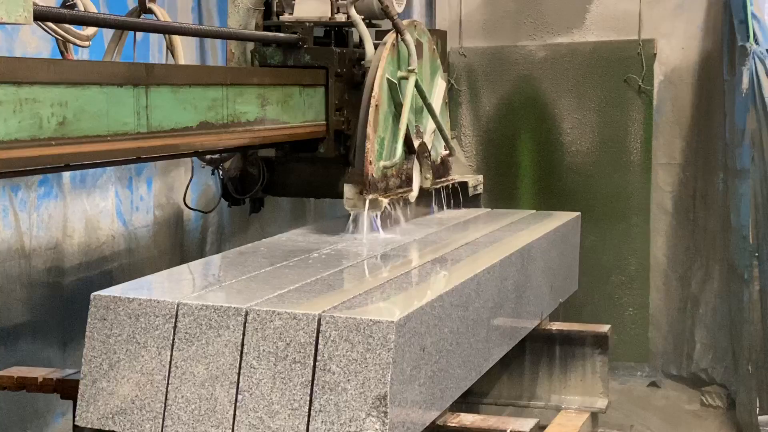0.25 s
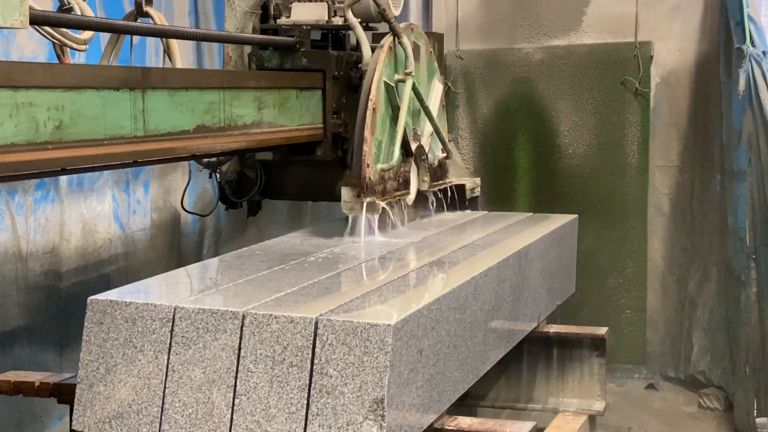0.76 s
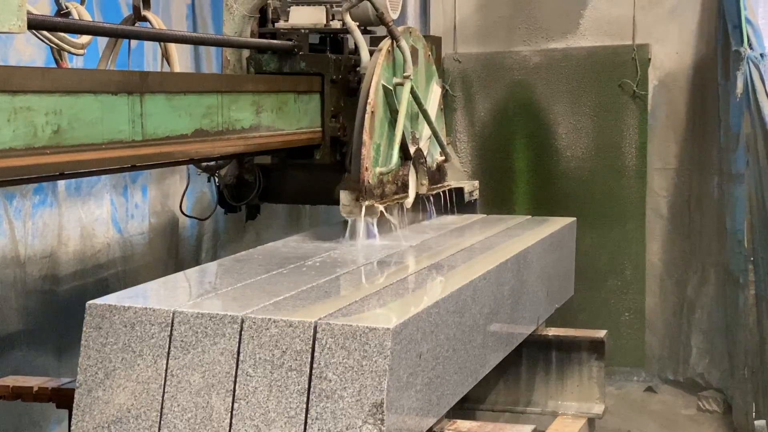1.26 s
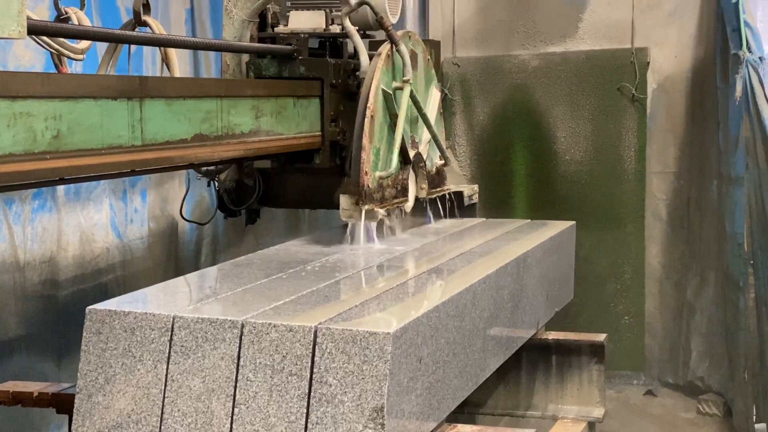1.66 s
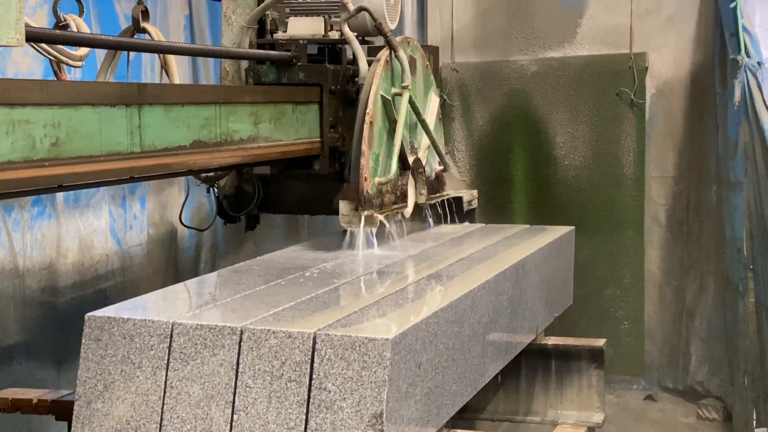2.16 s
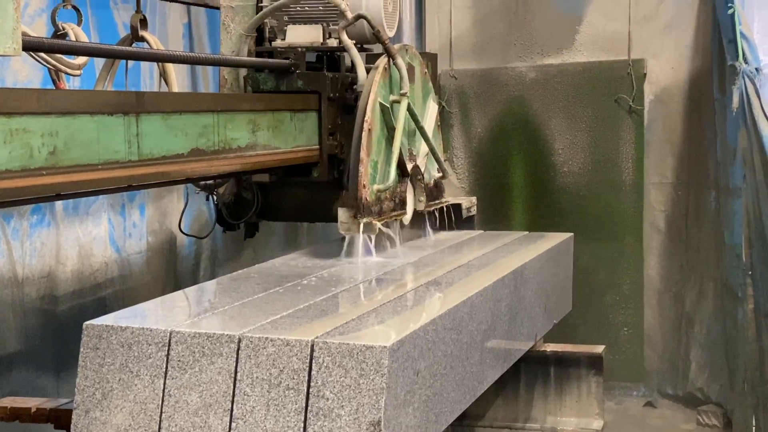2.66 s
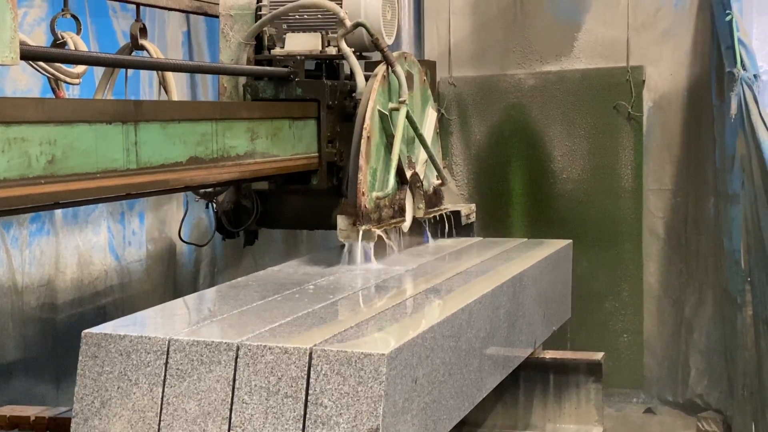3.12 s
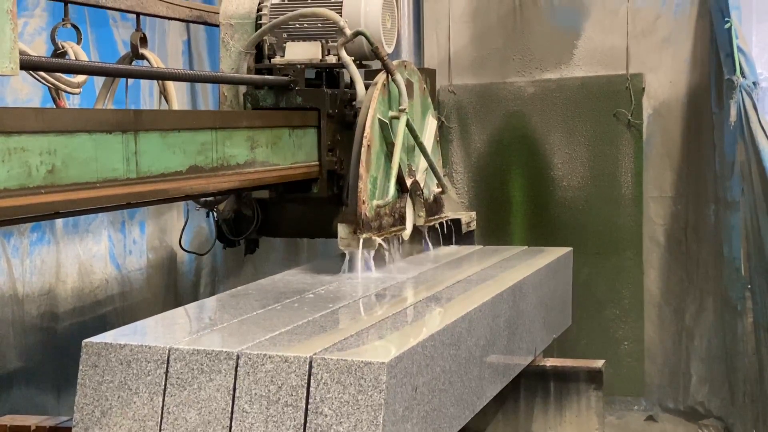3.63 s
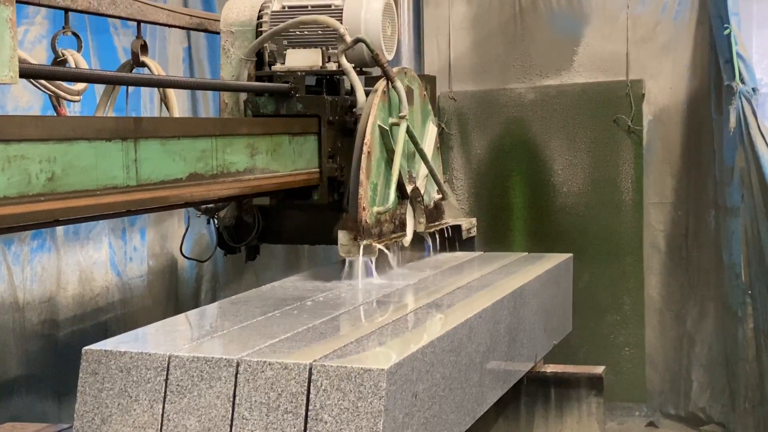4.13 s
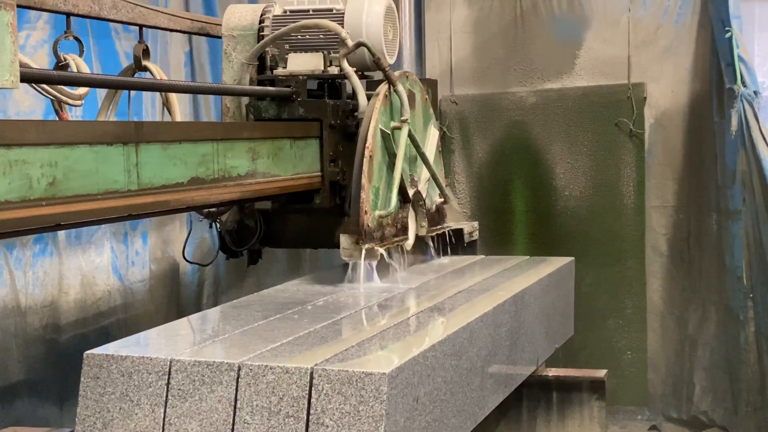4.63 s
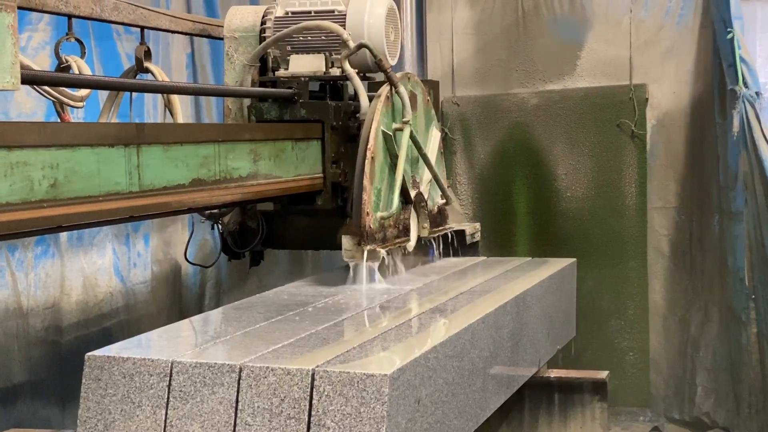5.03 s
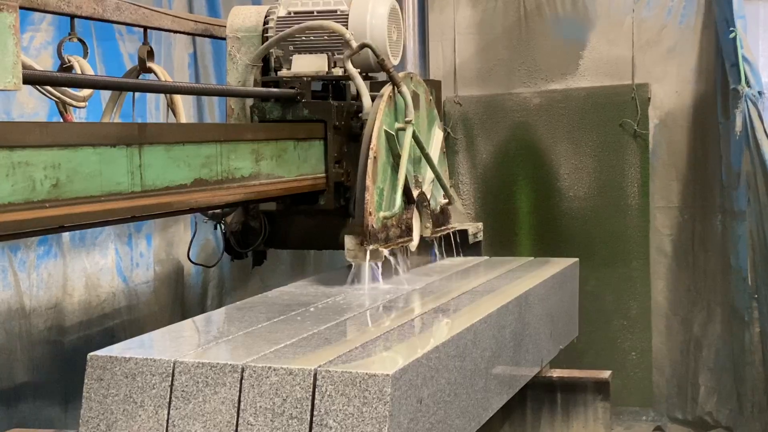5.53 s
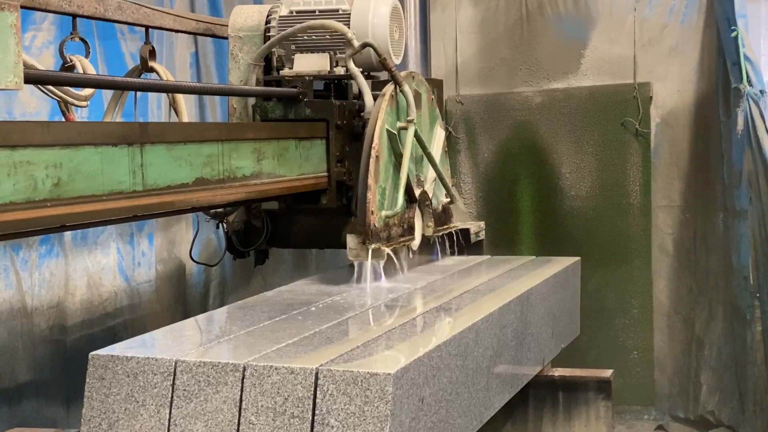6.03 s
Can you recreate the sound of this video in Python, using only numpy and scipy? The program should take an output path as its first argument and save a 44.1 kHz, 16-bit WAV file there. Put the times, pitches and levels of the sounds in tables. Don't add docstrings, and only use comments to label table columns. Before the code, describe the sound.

A large wet saw cuts granite without pause in a hard-walled workshop. Dense, gritty grinding noise nearly repeats about nine times a second, giving a fast whirring flutter. Motor hum and faint shaft tones lie beneath, water hisses above. Resonances shift slowly as the blade moves. Close stereo microphones; no start, stop or other event.

```python
import sys
import numpy as np
from scipy import signal
from scipy.fft import rfft, irfft
from scipy.io import wavfile
from scipy.ndimage import uniform_filter1d, map_coordinates

SR = 44100
rng = np.random.default_rng(int(sys.argv[2]) if len(sys.argv) > 2 else 0)


def attenuation_scalar(level_db):
    decades = np.asarray(level_db, float) / 20
    return 10 ** decades


def int16_out(signal):
    q = np.round(np.clip(np.atleast_2d(signal).T, -1, 1) * 32767)
    wavfile.write(sys.argv[1], SR, q.astype(np.int16))


N = 276948
HZ = np.fft.rfftfreq(N, 1 / SR)
TURN = 4938
STEPS = 4


def read(rows, hz):
    f, *columns = np.transpose(rows)
    return [np.interp(np.log(hz + 1), np.log(f + 1), column) for column in columns]


def drift(shape, frames, bins):
    field = uniform_filter1d(rng.standard_normal(shape), int(frames), 0)
    field = uniform_filter1d(field, int(bins), 1)
    return field / field.std()


# t/s, speed/turns per s
BLADE_SPEED = [
    (0, 8.908),
    (3.2, 8.931),
    (6.3, 8.955),
]


def turns():
    speed = np.interp(np.arange(N) / SR, *np.transpose(BLADE_SPEED))
    return np.cumsum(speed) / SR


# t/s, place/half waves
BLADE_PATH = [
    (0, 0),
    (1.5, .04),
    (2.6, .12),
    (3.3, .38),
    (4, .56),
    (4.7, .76),
    (5.2, 1),
    (5.6, 1.22),
    (6.3, 1.26),
]


def swept(t, mean_db, swing_db, place):
    blade_place = np.interp(t, *np.transpose(BLADE_PATH))
    return mean_db + swing_db * np.cos(np.pi * (blade_place - place))


# f/Hz, level/dB rms
MAINS_HUM = [
    (60, -66),
    (120, -63),
]


def motor():
    t = np.arange(N) / SR
    hum = np.zeros((2, N))
    for hz, db in MAINS_HUM:
        start = rng.random((2, 1))
        hum += np.sqrt(2) * attenuation_scalar(db) * np.cos(2 * np.pi * (hz * t + start))
    return hum


# order/tone cycles per turn, mean level/dB rms, swing/dB, loudest place/half waves
SHAFT_TONES = [(6, -64.0, 1.5, -0.0), (7, -63.5, 3.0, -0.01), (8, -63.5, 6.0, -0.18),
               (12, -55.5, 4.0, 0.28), (13, -63.5, 2.5, 0.77), (14, -56.5, 4.5, 0.08),
               (15, -56.0, 4.5, 0.4), (16, -50.5, 2, 0.45), (18, -63.0, 3.5, 0.15), (19, -63.5, 3.0, 0.4),
               (21, -53.5, 6.5, 0.14), (23, -57.0, 4.0, -0.12), (24, -65.0, 4.5, 0.76),
               (30, -59.0, 2.5, 0.5), (32, -59.5, 2.5, 0.62), (36, -61.5, 6.5, 0.83), (39, -58.5, 4, -0.2),
               (43, -61.5, 8.0, 0.86), (56, -61.5, 5, -0.55), (64, -64.0, 5.0, 0.52), (75, -58, 3.5, -0.5),
               (78, -59, 6, -0.7), (79, -59, 2, -0.7), (80, -55, 8, -0.72), (89, -61, 5, -0.15),
               (90, -56.0, 10.5, -0.38), (93, -63.0, 6.0, -0.86), (94, -60.5, 5.5, -0.5),
               (102, -59.5, 5.0, 0.91), (160, -51.0, 1.5, 0.53)]


def shaft():
    t, angle = np.arange(N) / SR, 2 * np.pi * turns()
    coarse = np.arange(0, N + 512, 512) / SR
    waver = drift((len(coarse), 2 * len(SHAFT_TONES)), 30, 1).reshape(len(coarse), -1, 2)
    start = rng.uniform(0, 2 * np.pi, (len(SHAFT_TONES), 2))
    hum = np.zeros((2, N))
    for k, (order, *wave) in enumerate(SHAFT_TONES):
        loose = .07 + .003 * order
        level = attenuation_scalar(swept(coarse, *wave) - .004 * order + 3.0 * loose * waver[:, k, 0])
        phase = order * angle + np.interp(t, coarse, 1.2 * loose * waver[:, k, 1])
        hum += np.sqrt(2) * np.interp(t, coarse, level) * np.cos(phase + start[k][:, None])
    return hum


# f/Hz, repeating share/0-1, memory/turns, throb depth/0-1
RIM_REPEAT = [(60, .1, 6, .01), (190, .2, 10, .01), (300, .66, 10, .05), (1000, .7, 7, .1),
              (1600, .7, 6.5, .1), (2300, .62, 3.5, .06), (3100, .65, 1.8, .04), (4300, .6, 1.1, .04),
              (6000, .5, .7, .05), (8000, .1, .5, .1), (15000, .01, .5, .1)]


def rim_pattern():
    share, memory, _ = read(RIM_REPEAT, np.arange(TURN // 2 + 1) * SR / TURN)
    keep, angle = np.exp(-1 / STEPS / memory), turns()
    fresh = rng.standard_normal((int(angle[-1] * STEPS) + 2, len(keep), 2)) @ [1, 1j]
    wear = [fresh[0]]
    for new in fresh[1:]:
        wear.append(keep * wear[-1] + np.sqrt(1 - keep ** 2) * new)
    rims = irfft(np.array(wear) * np.sqrt(share * TURN / 2), TURN).ravel()
    step = np.floor(angle * STEPS)
    place = (step + angle % 1) * TURN
    old, new = map_coordinates(rims, [[place, place + TURN]], order=3)
    return old + (new - old) * (angle * STEPS - step)


# t/s, level/dB
RIM_LOAD = [(0, -.2), (.25, -.6), (1, -0.4), (1.4, -0.3), (1.9, -0.2), (2.15, 0.1), (3.2, 0.3),
            (3.65, -0.3), (3.95, 0.3), (4.5, -.2), (4.8, 0.5), (5, -0.5), (5.4, 0.8), (5.9, .8), (6.3, -.5)]
# f/Hz, share of the load, mean level/dB, swing/dB, loudest place/half waves
NOISE_LAYERS = [
    (150, .3, -2, 2.5, 0.7),
    (700, 1.1, 0.85, 0.7, 1.4),
    (2000, 0.63, -0.05, 0.6, 0.83),
    (7000, .7, 0.01, 0.2, 0.27),
]
# f/Hz, width/Hz, mean level/dB, swing/dB, loudest place/half waves
WALL_WAVES = [(262, 64, 5, 0.5, -0.41), (351, 45, 5.5, -2.5, 0.37), (438, 22, 4, 5.5, -0.3),
              (510, 33, 6.5, 5.5, -0.72), (593, 32, 2, 1.5, 0.52), (688, 62, 3, -1, -0.62),
              (803, 104, 4.0, 1.5, -0.41), (910, 30, -2, 4.5, 0.22), (1065, 50, -3, 4.0, 0.2),
              (1270, 97, 0.5, 1, -0.51)]
# f/Hz, width/Hz, mean level/dB, swing/dB, loudest place/half waves
BLOCK_WAVES = [(1426, 58, 2.1, 2.0, -0.69), (1474, 40, 2.0, 2.5, -0.97), (1560, 36, 1.0, 2.7, -0.44),
               (1630, 47, 1.6, 1.0, -0.06), (1780, 45, 2.8, 1.5, 0.93), (1920, 50, 2.5, 1.5, -0.04),
               (2025, 76, 2.0, 1.0, 0.5), (2156, 30, 3.5, 2.7, 0.16), (2560, 51, 2.0, 4.0, -0.48),
               (2650, 79, 2.5, 1.5, 0.6), (2760, 56, 2.7, 5.0, -0.64)]


def colour(hz, t):
    load = np.interp(t, *np.transpose(RIM_LOAD))
    centres = [row[0] for row in NOISE_LAYERS]
    weights = np.array(read(np.c_[centres, np.eye(4)], hz))
    db = weights.T @ [share * load + swept(t, *wave) for _, share, *wave in NOISE_LAYERS]
    for peak_hz, width, *wave in WALL_WAVES + BLOCK_WAVES:
        peak = np.exp(-(2 * (hz - peak_hz) / width) ** 2)
        db += np.outer(peak, swept(t, *wave))
    slow_patches = .8 * drift(db.T.shape, 65, 5)
    quick_patches = .4 * drift(db.T.shape, 3, 150)
    db += (slow_patches + quick_patches).T
    angle = 2 * np.pi * np.interp(t * SR, np.arange(N), turns())
    depth = read(RIM_REPEAT, hz)[2][:, None]
    return attenuation_scalar(db) * np.sqrt(1 + depth * np.cos(angle - 2.7))


# f/Hz, level/dB per Hz
BODY_COLOUR = [(25, -100), (42, -97), (58, -81), (78, -82), (95, -73), (112, -77), (123, -64), (140, -68),
               (158, -77), (230, -75), (400, -75.5), (520, -74), (700, -73.5), (900, -74)]
# f/Hz, level/dB per Hz
RIM_COLOUR = [(1100, -67), (1450, -66), (2000, -66.5), (2400, -66.5), (3000, -65.5), (3700, -66),
              (4500, -64.5), (5300, -65), (6500, -67), (7900, -67)]
# f/Hz, level/dB per Hz
SPRAY_COLOUR = [(8050, -69.5), (9000, -72), (9800, -73), (10300, -71), (11800, -72), (12500, -79.5),
                (13200, -85.5), (14200, -81), (15700, -80)]


def grinding():
    fresh_share = 1 - read(RIM_REPEAT, HZ)[0]
    grit = irfft(rfft(rng.standard_normal((2, N))) * np.sqrt(fresh_share), N)
    rough = grit + [rim_pattern(), rim_pattern()]
    hz, t, z = signal.stft(rough, SR, nperseg=2048, noverlap=1536)
    moving = signal.istft(z * colour(hz, t), SR, nperseg=2048, noverlap=1536)[1][:, :N]
    tone_db = read(BODY_COLOUR + RIM_COLOUR + SPRAY_COLOUR, HZ)[0]
    return irfft(rfft(moving) * attenuation_scalar(tone_db) * np.sqrt(SR / 2), N)


# f/Hz, level/dB, share in step/-1 to 1, share a quarter cycle ahead/-1 to 1
LOW_PORTS = [(40, -26, -.3, .2), (140, -18.5, -0.26, .35), (330, -10, -0.18, .3), (700, -3, 0.13, .33),
             (1200, -7.5, .27, .38), (1500, -16, .1, .3), (2760, -9.5, -0.021, 1), (5200, -9, 0, .9)]
# f/Hz, level/dB, share in step/-1 to 1, share a quarter cycle ahead/-1 to 1
HIGH_PORTS = [(5700, -11, 0, -.88), (6400, -4.5, 0, -.88), (7900, -2, 0, .92), (8600, 5.5, 0, .93),
              (10300, -6.5, 0, .85), (11300, -6, 0, -.92), (12600, 3, 0, -.88), (13200, 8, 0, -.6),
              (14000, 4.5, 0, .75), (15200, -3, 0, .78)]


def ports(total, other):
    db, in_step, ahead = read(LOW_PORTS + HIGH_PORTS, HZ)
    free = np.sqrt(np.clip(1 - in_step ** 2 - ahead ** 2, 0, 1))
    tied = (in_step + 1j * ahead) * rfft(total)
    difference = irfft(attenuation_scalar(db) * (tied + free * rfft(other)), N)
    return np.array([total + difference, total - difference])


def scene():
    total, other = shaft() + motor() + grinding()
    return ports(total, other)


# 0 sum or 1 difference, low f/Hz, high f/Hz, low shake/Hz, high shake/Hz
EMPTY_BANDS = [
    (0, 12920, 13860, 105, 100),
    (0, 15725, 22050, 0, 0),
    (1, 1550, 2550, 90, 110),
    (1, 5330, 5620, 70, 20),
    (1, 6330, 7870, 40, 55),
    (1, 10350, 11480, 5, 220),
    (1, 15130, 22050, 0, 0),
]
# t/s, low f/Hz, high f/Hz
HEARD_BANDS = [
    (1.005, 6300, 6950),
    (2.212, 6850, 7950),
    (4.882, 6300, 7950),
]


def thin_bands(dry, lead):
    pair = np.pad([dry[0] + dry[1], dry[0] - dry[1]], ((0, 0), (lead, 0))) / 2
    hz, t, z = signal.stft(pair, SR, window="cosine", nperseg=2048, noverlap=1024)
    shake = drift((len(t), 2 * len(EMPTY_BANDS)), 2, 1).reshape(len(t), -1, 2)
    gate = np.ones(z.shape)
    jump = 172.27
    for k, (which, *edges) in enumerate(EMPTY_BANDS):
        moved = np.round(shake[:, k] * edges[2:] / jump) * jump
        low, high = (edges[:2] + moved).T
        gate[which] *= (hz[:, None] < low) | (hz[:, None] > high)
    for s, low, high in HEARD_BANDS:
        near = abs(t - lead / SR - s) < .02
        gate[1][np.outer((hz > low) & (hz < high), near)] = 1
    thinned = signal.istft(z * gate, SR, window="cosine", nperseg=2048, noverlap=1024)[1]
    total, difference = thinned[:, lead:lead + N]
    return np.array([total + difference, total - difference])


def roll_off(x):
    return signal.sosfilt(signal.butter(12, 16950, fs=SR, output="sos"), x)


def record(dry):
    mix = thin_bands(dry, lead=1024 - 251)
    return roll_off(mix)


dry = scene()
out = record(dry)
int16_out(out)
```